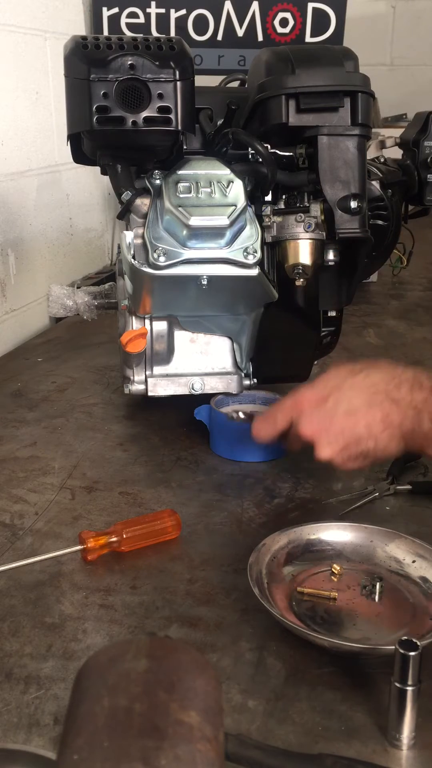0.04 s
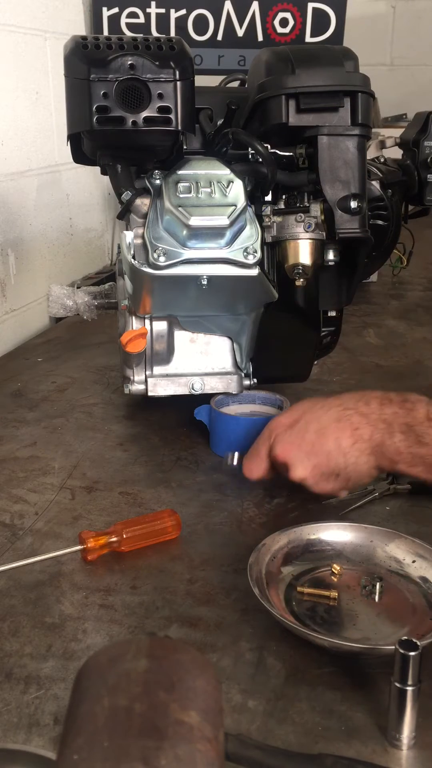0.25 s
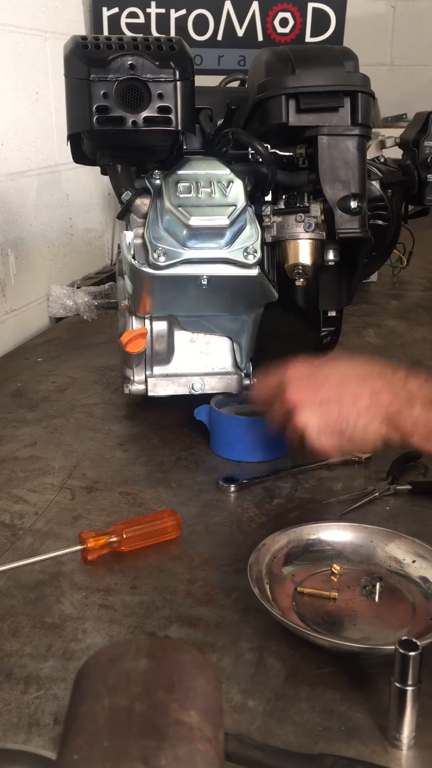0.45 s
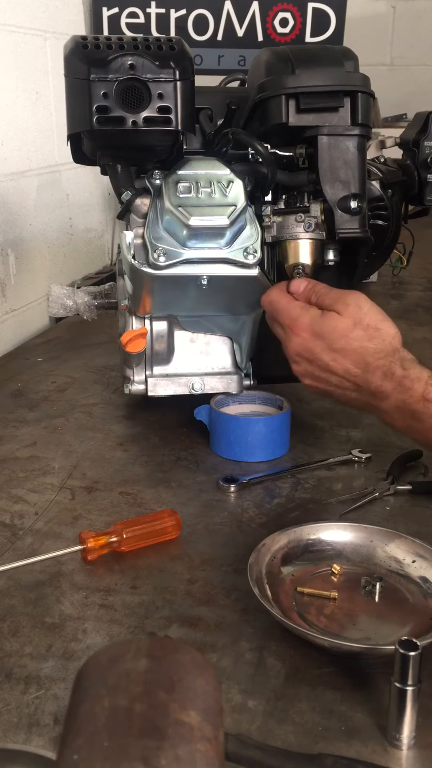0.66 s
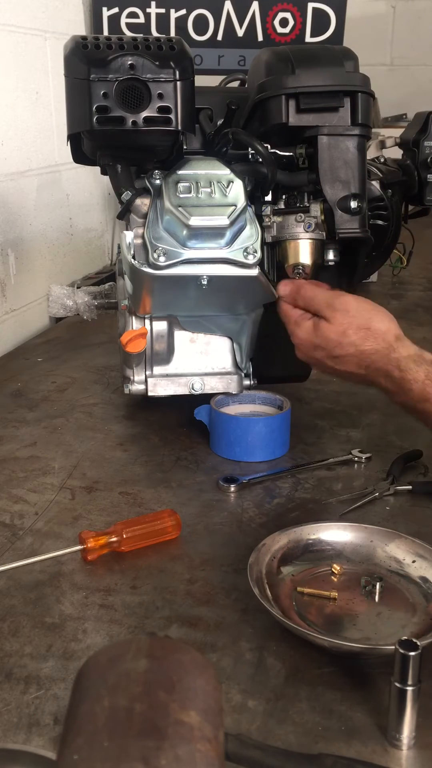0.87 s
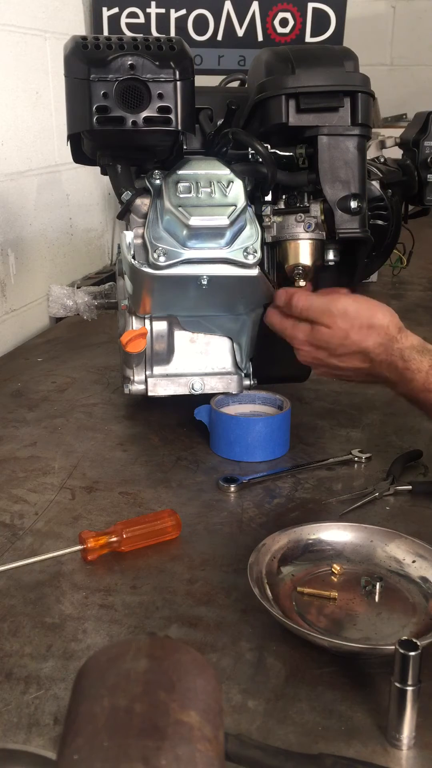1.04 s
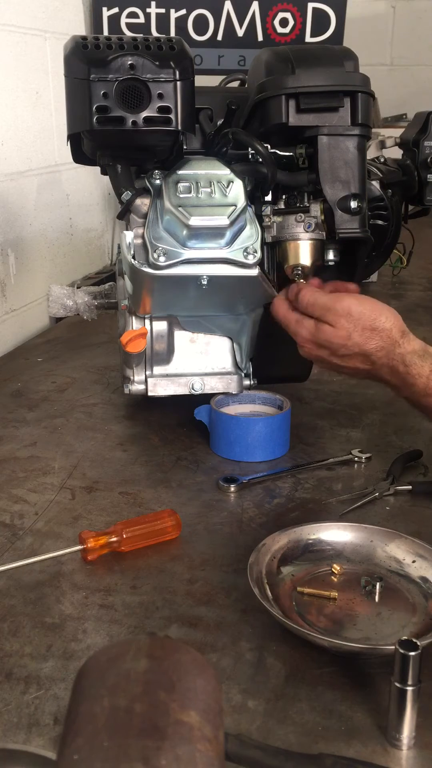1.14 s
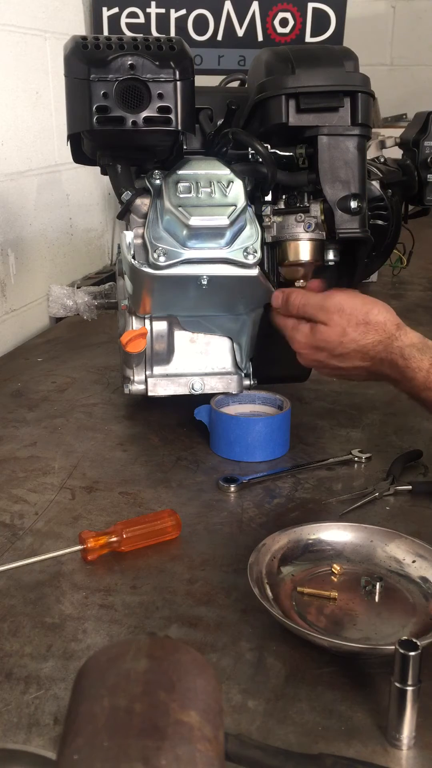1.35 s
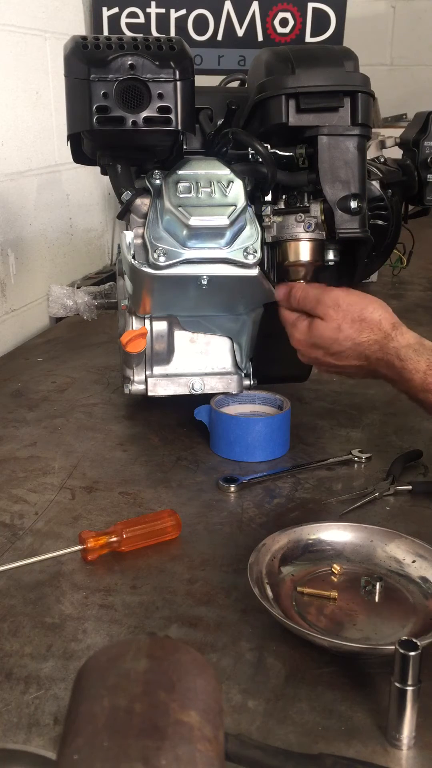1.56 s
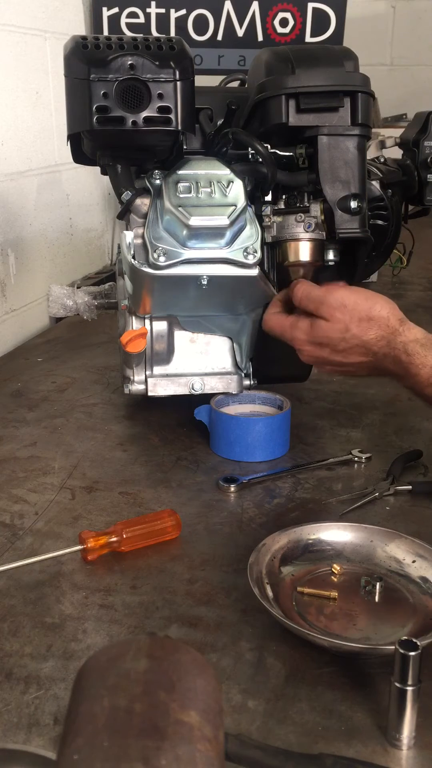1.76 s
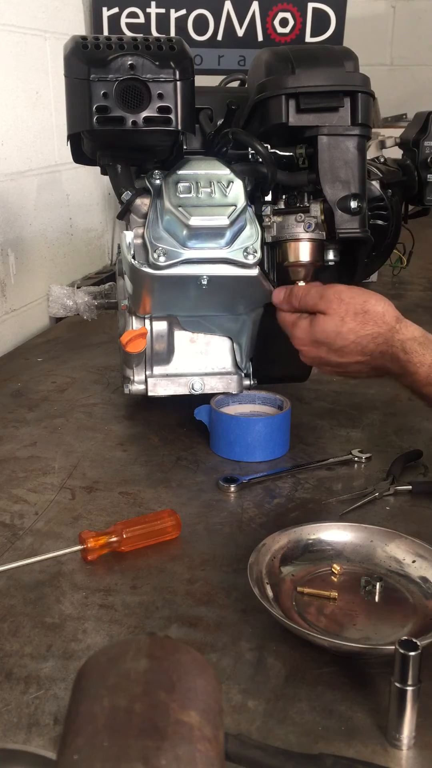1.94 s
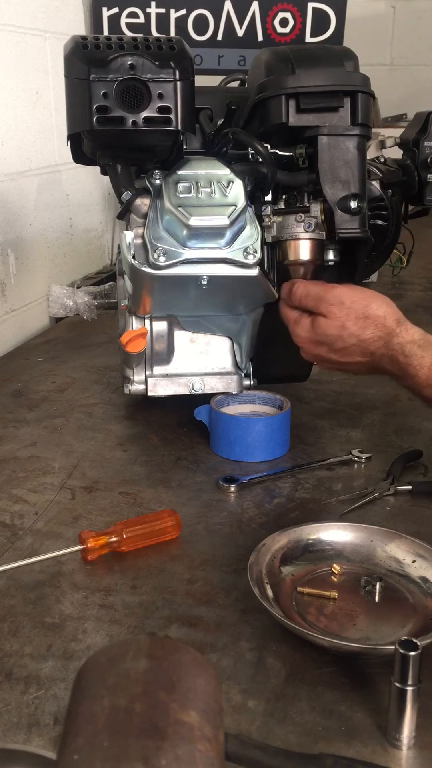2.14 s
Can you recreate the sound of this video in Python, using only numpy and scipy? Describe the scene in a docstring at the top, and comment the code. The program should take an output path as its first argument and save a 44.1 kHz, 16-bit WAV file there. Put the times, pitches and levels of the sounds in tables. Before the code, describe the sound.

A steel wrench is set down on a metal workbench with a knock and a sharp, ringing clank. Then fingers turn a bolt on a small engine, with soft knocks and light clinks, close by in a slightly echoing workshop.

```python
"""Workshop: a steel wrench is laid on the bench. One end knocks down, then the other drops with a
double clank; wrench and bench ring, and the walls reverberate. Fingers then work the bolt under a
small engine's carburettor: the engine body knocks dully, the thread sticks and slips, and the loose
metal float bowl clinks, rings and chatters. A low hum and soft room noise lie under it all."""
import sys
import numpy as np
from scipy import signal
from scipy.fft import rfft, irfft
from scipy.io import wavfile
from scipy.ndimage import uniform_filter1d, map_coordinates

SR = 44100
rng = np.random.default_rng(int(sys.argv[2]) if len(sys.argv) > 2 else 0)


def inscribe(sig):
    """Save sig as 16-bit PCM at rate SR to the path in sys.argv[1].

    A 1-D sig is mono; a 2-D sig holds one channel per row.
    Samples are clipped to [-1, 1] before scaling.
    """
    pcm = np.round(np.clip(np.atleast_2d(sig).T, -1, 1) * 32767)
    wavfile.write(sys.argv[1], SR, pcm.astype(np.int16))


N = 97020

# engine body response: f/Hz, gain/dB
ENGINE_SPECTRUM = [(100, -40), (320, -4.5), (450, -8), (700, 9.5), (900, -4), (1200, 3.5), (1900, -5),
                   (2600, -8), (4500, -22.5), (8500, -22), (10500, -40), (15000, -44)]
# engine body modes: f/Hz, level/dB, t60/s
ENGINE_BODY_MODES = [(316, -10, 0.14), (583, -9.5, 0.13), (720, -2, 0.09), (1197, -13.5, 0.24),
                     (1393, -19, 0.15), (1618, -12, 0.38), (1920, -2.5, 0.062)]


def wrench():
    """One end lands with a tiny rebound, the other clanks twice; wrench and bench ring on."""
    # first end landing: t/s, level/dB, tilt/(dB/octave)
    knocks = [(0.208, -13, 0), (0.2118, -20.5, -4.5), (0.2621, -34.5, 1)]
    # f/Hz, gain/dB
    knock_spectrum = [(60, -24.5), (300, -17.5), (600, -7), (1300, 0.5), (2000, -4.5), (3000, -7),
                      (4400, -3), (6800, -6), (9000, -18), (15000, -35.5)]
    # free end dropping and bouncing: t/s, level/dB, tilt/(dB/octave)
    clanks = [(0.3948, -2, 1), (.4115, -2, -1), (0.4157, -18, -0.5), (0.421, -17.5, 2), (0.444, -24, -7)]
    # f/Hz, gain/dB
    clank_spectrum = [(60, -22.5), (300, -16.5), (550, -16.5), (1200, -4), (1800, -8), (2900, -12),
                      (3300, -4.5), (4900, -2.5), (5400, 0), (5900, -1), (8500, -3.5), (9200, -9),
                      (10150, -4), (10600, -17.5), (11500, -9.5), (15000, -17.5)]
    # wrench lying on the bench: f/Hz, level/dB, t60/s
    steel_modes = [(1173, -4, .16), (1296, -7, .16), (3555, -7, .2), (4268, -4, .25), (5134, -4, .1),
                   (5342, 1, .08), (5392, 3, .1), (5510, 0, .13), (6175, -4, .12), (6752, -5, .12),
                   (7050, -3, .1), (7767, -3, .15), (8590, -4, .08), (13620, -6, .05)]
    # bench thud: f/Hz, level/dB, t60/s
    bench_modes = [(135, -9.5, 0.16), (193, -14.5, 0.051), (296.2, -1.5, .16), (455, -3, 0.12),
                   (920, -3, 0.14)]
    rebound_s, thud_swell_s = 0.00088, 0.014
    out = np.zeros(N)
    for at_s, db, tilt_db in knocks:
        blow = undb(db) * colour(crack(t60_s=0.032), knock_spectrum, tilt_db)
        add(out, at_s, blow)
        add(out, at_s + rebound_s, 0.45 * blow)
    for at_s, db, tilt_db in clanks:
        add(out, at_s, undb(db) * colour(crack(t60_s=0.025), clank_spectrum, tilt_db))
        add(out, at_s, undb(db - 15) * struck_ring(steel_modes))
    thud = struck_ring(bench_modes)
    swell = 1 - np.exp(-times()[:len(thud)] / thud_swell_s)
    add(out, 0.414, undb(-23.5) * thud * swell)
    return out


def bowl_clinks():
    """Each tap of the bowl on its seat clicks, shakes the engine, chokes the old ring and rings anew."""
    # t/s, click/dB, ring/dB, ring t60/s, upper-mode share/1, click tilt/(dB/octave)
    taps = [(1.072, -55, -46, 0.24, 0, 5), (1.2267, -29, -52, 0.058, 0.1, 3),
            (1.2367, -36, -25.5, 0.065, 0, -2), (1.3019, -31.5, -27.5, 0.15, 0, 0),
            (1.3279, -31.5, -34, .2, 0.4, -2.5), (1.333, -39, -27.5, 0.39, 1, 14),
            (1.414, -62, -41, 0.22, 0, -4), (1.44, -51, -44, 0.06, 0.9, -3), (1.471, -66, -45, 0.36, 0, -6),
            (1.581, -64, -51.5, 0.13, 0.37, 13), (1.7036, -65, -49, 0.087, 1, 2),
            (1.9445, -51.5, -52.5, 0.11, 0.8, -3), (2.007, -81.5, -56.5, .12, 1, 0),
            (2.154, -68, -48.5, 0.21, 1, -11), (2.168, -42, -46, 0.13, 1, 0),
            (2.1745, -32, -38.5, 0.1, 1, -3.5)]
    # f/Hz, gain/dB
    click_spectrum = [(150, -9), (700, -5.5), (1400, 13), (2400, -3.5), (3500, 9), (4800, 3), (7000, 2.5),
                      (8600, 1.5), (10300, -5), (12000, -4.5), (12900, 7), (14000, -24), (15000, -19)]
    click_t60_s, choke_db = 0.024, -7
    contacts, ringing = np.zeros(N), np.zeros(N)
    for at_s, click_db, ring_db, t60_s, upper_share, tilt_db in taps:
        add(contacts, at_s, undb(click_db) * colour(crack(click_t60_s), click_spectrum, tilt_db))
        add(contacts, at_s, undb(click_db - 11) * struck_ring(ENGINE_BODY_MODES))
        choke_ramp = np.clip((times() - at_s) / click_t60_s, 0, 1)
        ringing *= undb(choke_db * choke_ramp)
        add(ringing, at_s, undb(ring_db) * ring(bowl_modes(t60_s, upper_share)))
    ping_s, ping_hz, ping_t60_s = 2.168, 8580, 0.037  # one bright catch of the rim
    add(ringing, ping_s, undb(-35) * ring([(ping_hz, 0, ping_t60_s)]))
    return contacts + ringing


def bowl_modes(t60_s, upper_share):
    """The bowl's modes come in pairs; the contact point decides which of the two speaks."""
    # lower f/Hz, upper f/Hz, level/dB, t60 factor/1
    pairs = [(3216, 3282, 0, 1), (8312, 8597, -18, .45), (12930, 13130, -20, .35)]
    upper_share = np.clip(upper_share, 0.01, 0.99)
    return [(hz, db + 20 * np.log10(share), t60_s * t60_factor)
            for lower_hz, upper_hz, db, t60_factor in pairs
            for hz, share in ((lower_hz, 1 - upper_share), (upper_hz, upper_share))]


def engine_bumps():
    """The hand knocks the carburettor dully against the engine body."""
    # t/s, level/dB, tilt/(dB/octave)
    bumps = [(.7991, -40.5, 4), (0.9784, -42.5, 2), (1.0619, -29, 0), (1.0648, -34.5, -5),
             (1.9121, -49, 0.5), (2.155, -44.5, 2.5), (2.174, -43, 3), (2.186, -31, 5.5)]
    out = np.zeros(N)
    for at_s, db, tilt_db in bumps:
        add(out, at_s, undb(db) * colour(crack(t60_s=0.029), ENGINE_SPECTRUM, tilt_db))
        add(out, at_s, undb(db - 11) * struck_ring(ENGINE_BODY_MODES))
    return out


def thread_rub():
    """The thread sticks and slips under an uneven grip, exciting engine and bowl."""
    # bolt turning: t/s, rub/dB, bowl shiver/dB
    turning = [(.9, -94, -95), (.96, -59.5, -74), (1.02, -58.5, -70), (1.055, -57, -71), (1.14, -56.5, -66),
               (1.2, -79, -71), (1.25, -40.5, -56), (1.29, -55, -45), (1.34, -42, -46), (1.43, -58, -53),
               (1.484, -48, -47), (1.564, -61.5, -65), (1.593, -48.5, -62), (1.65, -55, -61),
               (1.718, -47.5, -51.5), (1.79, -91, -85), (1.888, -71, -94), (1.948, -55.5, -61.5),
               (2.06, -76, -74)]
    t = times()
    at_s, rub_db, shiver_db = np.array(turning).T
    slips = grits(per_s=1500) * (t > at_s[0])
    grip_db = 3 * wander(per_s=50)
    friction = slips * undb(grip_db)
    engine_force = friction * undb(np.interp(t, at_s, rub_db))
    bowl_force = friction * undb(np.interp(t, at_s, shiver_db))
    rub = colour(engine_force, ENGINE_SPECTRUM)
    body = undb(-3.5) * shake(engine_force, ENGINE_BODY_MODES)
    shiver = shake(bowl_force, bowl_modes(t60_s=0.062, upper_share=0.5))
    return rub + body + shiver


def rim_chatter():
    """The loose bowl rattles on its rim: tiny impacts drive high, short-lived modes."""
    # rattle envelope: t/s, level/dB
    envelope = [(1.2, -90), (1.235, -72), (1.29, -80), (1.33, -53), (1.37, -61), (1.45, -63.5),
                (1.485, -59.5), (1.56, -80), (1.72, -76), (1.8, -93)]
    # f/Hz, level/dB, t60/s
    rim_modes = [(8200, 0, .04), (8590, 14, 0.018), (9000, -19, .03), (9440, -26, .03), (13400, 4, 0.035),
                 (12700, -1, .03), (13000, -14, .03)]
    t = times()
    at_s, db = np.array(envelope).T
    impacts = grits(per_s=360) * undb(np.interp(t, at_s, db)) * (t > at_s[0])
    return shake(impacts, rim_modes)


def skin_slides():
    """Skin slides over metal in brief bell-shaped swells of hiss."""
    # centre t/s, half width/s, level/dB
    slides = [(.99, .04, -69.5), (1.132, 0.0091, -57), (1.228, .012, -56.5), (1.678, 0.016, -73),
              (1.942, 0.023, -67.5)]
    # f/Hz, gain/dB
    hiss_spectrum = [(1000, -19), (4500, -16.5), (7200, 1), (10500, -12), (15000, -8)]
    t = times()
    envelope = sum(undb(db) * np.exp(-((t - at_s) / half_s) ** 2 / 2) for at_s, half_s, db in slides)
    return envelope * colour(rng.standard_normal(N), hiss_spectrum)


def workshop(x, late_db):
    """Direct sound, quick reflections off bench and engine, then a wall tail whose mids last longest."""
    # reverberation time: f/Hz, t60/s
    decay = [(150, 0.41), (1000, 0.81), (2500, 0.91), (4500, 0.88), (7500, 0.71), (10000, 0.42),
             (15000, 0.41)]
    # wall tail: f/Hz, gain/dB
    tail_spectrum = [(100, 2.5), (600, 3), (1200, -3.5), (2300, 4), (4300, -1.5), (5400, -5), (7000, -5.5),
                     (14000, 3.5)]
    early_db, early_t60_s, predelay_s = -10, 0.18, 0.0055
    t = times()[:SR]
    hz = np.arange(SR // 2 + 1)
    noise_bins = rfft(rng.standard_normal(SR))
    centres_hz, t60s_s = np.array(decay).T
    late = np.zeros(SR)
    for band, t60_s in zip(np.eye(len(decay)), t60s_s):
        band_gain = on_log(hz, list(zip(centres_hz, band)))
        late += irfft(noise_bins * band_gain) * fade(t, t60_s)
    late = colour(late, tail_spectrum) * (t > predelay_s)
    early = rng.standard_normal(SR) * fade(t, early_t60_s) * (t > predelay_s)
    echo = undb(late_db) * late / np.linalg.norm(late) + undb(early_db) * early / np.linalg.norm(early)
    return x + signal.fftconvolve(x, echo)[:N]


def hum():
    """Two low tones, each wavering in level."""
    # t/s, fundamental/dB, overtone/dB
    envelope = [(0, -52, -70.5), (.6, -59.5, -59.5), (.72, -56, -58), (0.851, -57.5, -70), (1.2, -59, -66),
                (1.6, -59, -71.5), (1.952, -54.5, -61.5), (2.098, -52, -54.5), (2.2, -60, -58)]
    fundamental_hz, overtone_hz = 58.4, 114.3
    t = times()
    at_s, fundamental_db, overtone_db = np.array(envelope).T
    out = np.zeros(N)
    for hz, db in ((fundamental_hz, fundamental_db), (overtone_hz, overtone_db)):
        waver = 1 + 0.39 * wander(per_s=18)
        out += undb(np.interp(t, at_s, db)) * waver * np.sqrt(2) * np.sin(2 * np.pi * hz * t)
    return out


def room_noise():
    """Soft, steady, bass-heavy noise."""
    # f/Hz, gain/dB
    air_spectrum = [(20, -11), (40, -6.5), (60, -5), (90, 1), (140, -10), (280, -15.5), (450, -20),
                    (1200, -25), (3000, -37), (8000, -40), (15000, -43.5)]
    hz = np.arange(N // 2 + 1) * SR / N
    bins = rfft(rng.standard_normal(N)) * undb(on_log(hz, air_spectrum))
    return undb(-57.5) * unit(irfft(bins, N))


def crack(t60_s, size=8192):
    """Countless short-lived modes: a dying noise burst with its spectrum evened out."""
    envelope = fade(np.arange(size) / SR, t60_s)
    bins = rfft(rng.standard_normal(size) * envelope, 2 * size)
    local_power = uniform_filter1d(abs(bins) ** 2, size=160)
    return irfft(bins * np.sqrt(np.sum(envelope ** 2) / local_power))[:size]


def ring(modes, size=32768):
    """Decaying sines from rows of f/Hz, level/dB, t60/s; starting power near 1."""
    t = np.arange(size) / SR
    out = sum(undb(db) * fade(t, t60_s) * np.sin(2 * np.pi * hz * t) for hz, db, t60_s in modes)
    return out / np.sqrt(sum(undb(db) ** 2 for _, db, _ in modes) / 2)


def struck_ring(modes, size=32768):
    """Modes struck at a random spot, so they start out of phase."""
    t = np.arange(size) / SR
    out = sum(undb(db) * fade(t, t60_s) * np.sin(2 * np.pi * (hz * t + rng.random()))
              for hz, db, t60_s in modes)
    attack = 1 - fade(t, 0.0013)
    return out * attack / np.sqrt(sum(undb(db) ** 2 for _, db, _ in modes) / 2)


def grits(per_s, spread_db=2.5):
    """Tiny slips at random moments, a few larger than the rest; unit RMS."""
    strength = undb(spread_db * np.minimum(rng.exponential(size=N), 3))
    slipping = rng.random(N) < per_s / SR
    return unit(slipping * rng.choice([-1, 1], N) * strength)


def shake(force, modes):
    """A force drives a body's modes through a unit-energy response."""
    body = ring(modes)
    return signal.fftconvolve(force, body / np.linalg.norm(body))[:N]


def colour(x, points, tilt_db=0, size=2048):
    """Minimum-phase filter through f/Hz, gain/dB points, plus tilt_db per octave; unit power gain."""
    hz = np.arange(size // 2 + 1) * SR / size
    octaves = np.log2(np.maximum(hz, 300) / 2000)
    gain = unit(undb(on_log(hz, points) + tilt_db * octaves))
    cepstrum = irfft(np.log(gain))
    cepstrum[1:size // 2] *= 2  # fold onto positive time
    cepstrum[size // 2 + 1:] = 0
    response = irfft(np.exp(rfft(cepstrum)))
    return signal.oaconvolve(x, response)[:len(x)]


def on_log(hz, points):
    """Interpolate f/Hz, value points on a log-frequency axis."""
    points_hz, values = np.array(points, float).T
    return np.interp(np.log(np.maximum(hz, 1)), np.log(points_hz), values)


def wander(per_s):
    """Random values, joined smoothly."""
    return map_coordinates(rng.standard_normal(1024), [times() * per_s], mode="wrap")


def fade(t, t60_s):
    return np.exp(-np.log(1000) * t / np.maximum(t60_s, 1e-3))


def add(out, at_s, x):
    i = int(at_s * SR)
    out[i:i + len(x)] += x[:N - i]


def undb(db):
    return 10 ** (np.asarray(db) / 20)


def unit(x):
    return x / np.sqrt(np.mean(x ** 2))


def times():
    return np.arange(N) / SR


def scene():
    """Mono mix: the wrench fills the room, the carburettor stays drier."""
    carburettor = engine_bumps() + bowl_clinks() + thread_rub() + rim_chatter() + skin_slides()
    work = workshop(wrench(), late_db=-11) + workshop(carburettor, late_db=-22)
    return (work + room_noise() + hum())[None]


def record(dry):
    """Round off the loudest peaks; cut the deep bass and the top."""
    ceiling, low_cut_hz, top_hz = 1.3, 42, 15700
    rounded = ceiling * np.tanh(dry / ceiling)
    highpass = signal.butter(4, low_cut_hz, "high", fs=SR, output="sos")
    lowpass = signal.ellip(10, 0.1, 80, top_hz, fs=SR, output="sos")
    return signal.sosfilt(lowpass, signal.sosfilt(highpass, rounded))


dry = scene()
out = record(dry)
inscribe(out)
```